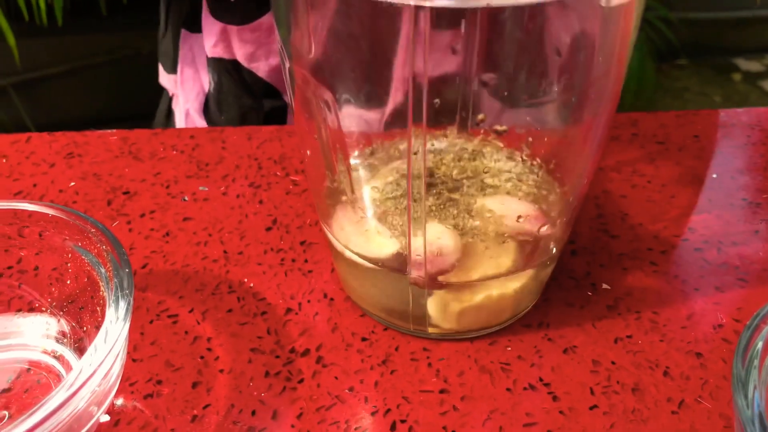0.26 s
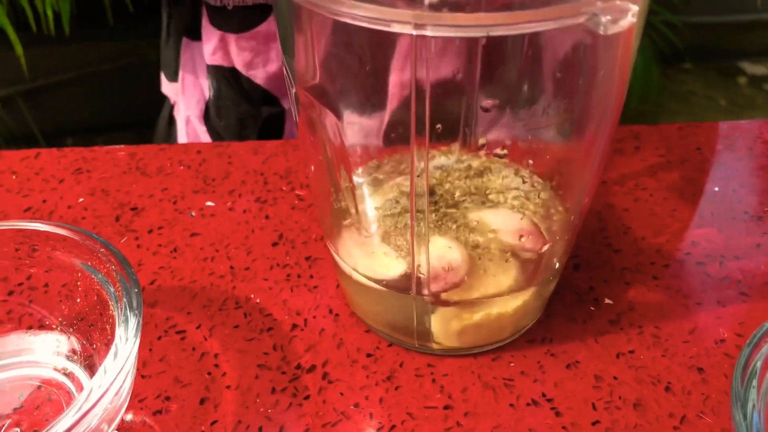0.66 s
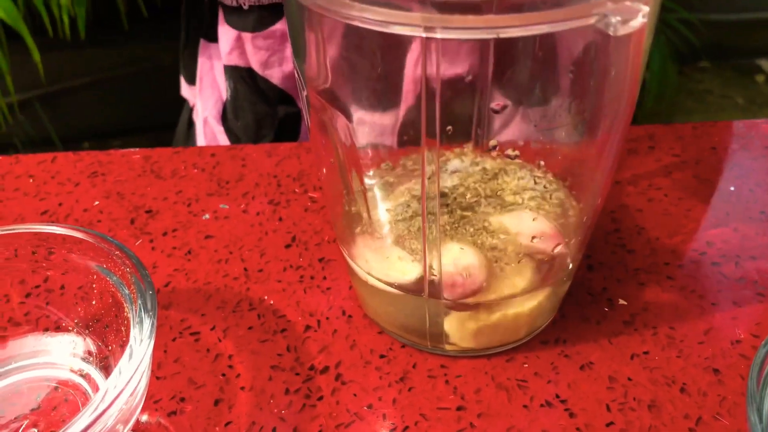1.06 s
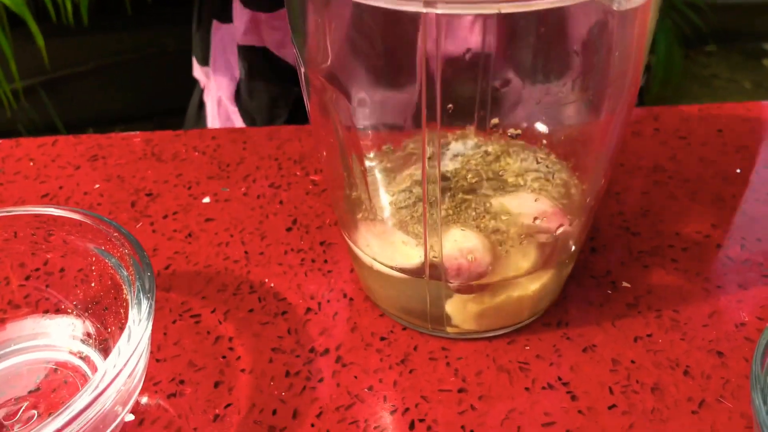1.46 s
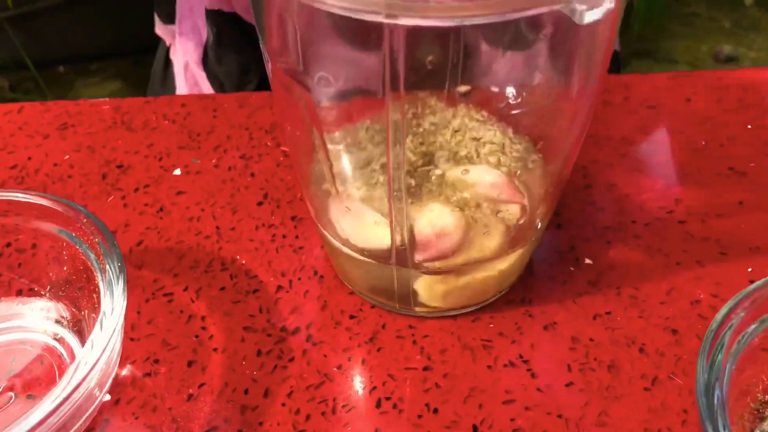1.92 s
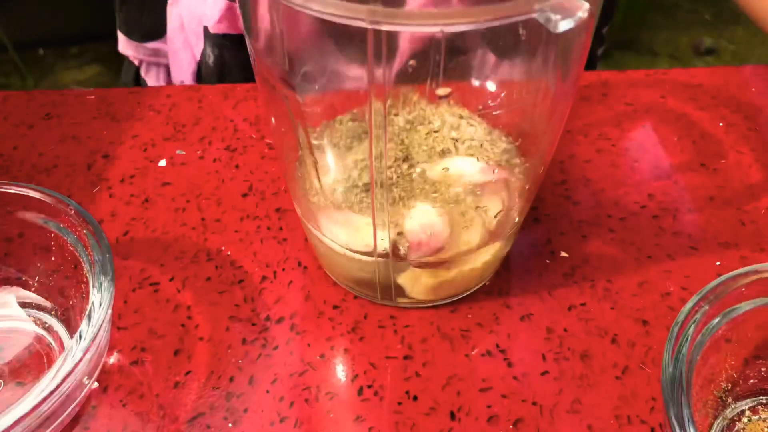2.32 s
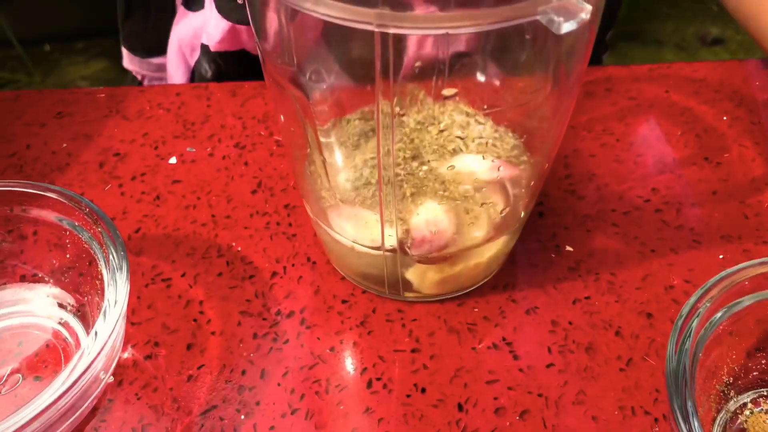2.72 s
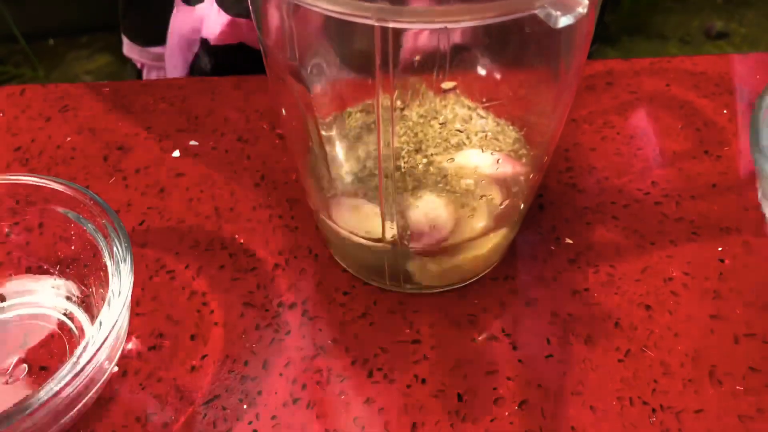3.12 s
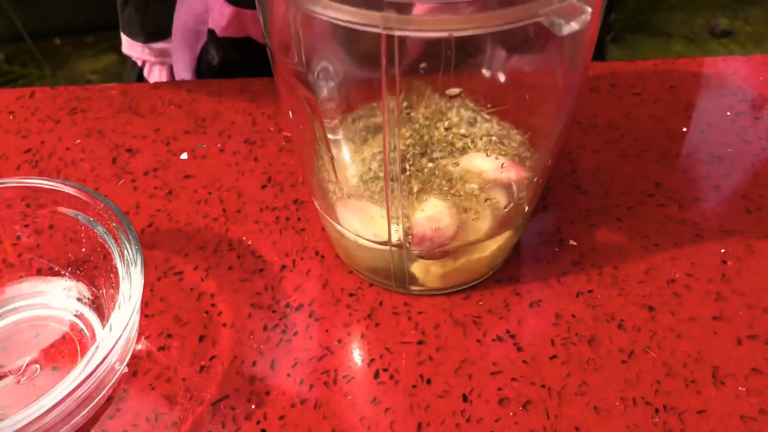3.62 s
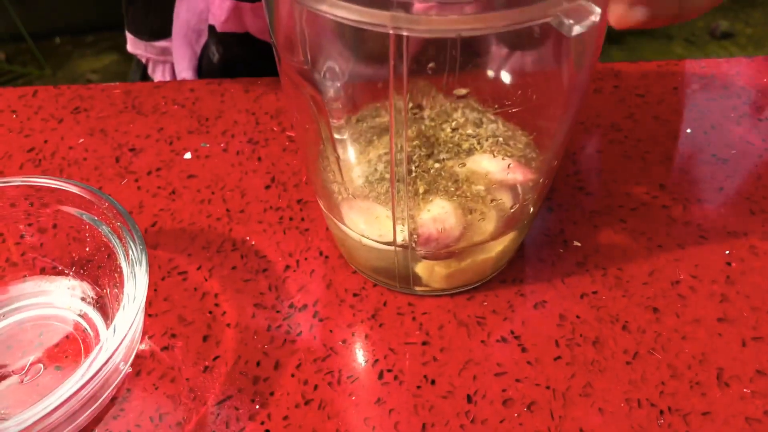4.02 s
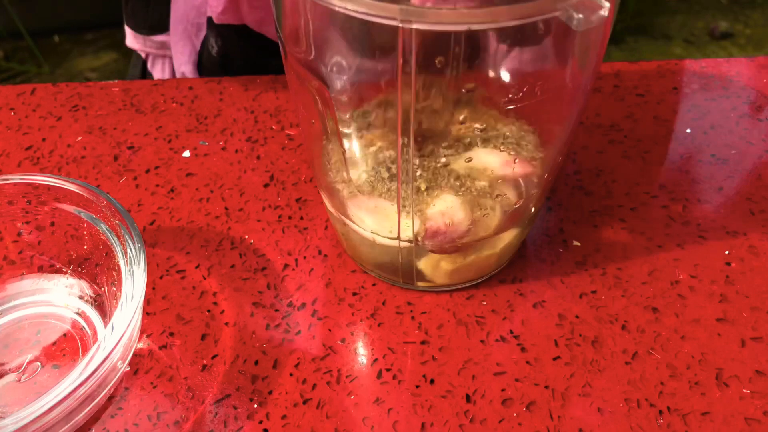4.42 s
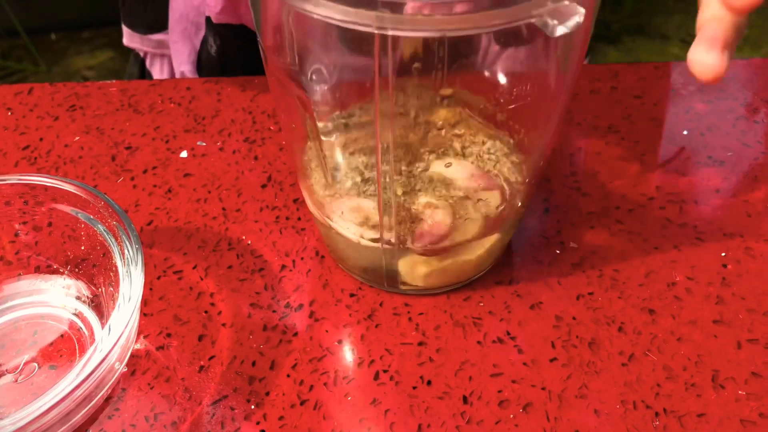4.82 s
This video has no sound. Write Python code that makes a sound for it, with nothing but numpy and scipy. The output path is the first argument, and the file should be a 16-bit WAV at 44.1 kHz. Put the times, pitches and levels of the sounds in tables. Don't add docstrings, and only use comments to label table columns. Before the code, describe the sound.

In a quiet garden with cheeping birds, a glass bowl clatters onto a stone counter, then another knocks hollowly against a blender jar.

```python
import sys
import numpy as np
from scipy import signal
from scipy.fft import rfft, irfft
from scipy.io import wavfile
from scipy.ndimage import uniform_filter1d

SR = 44100
rng = np.random.default_rng(int(sys.argv[2]) if len(sys.argv) > 2 else 0)


def pcm_store(signal):
    levels = np.round(np.clip(np.atleast_2d(signal), -1, 1) * 32767)
    wavfile.write(sys.argv[1], SR, levels.astype(np.int16).T)


def gain_from_decibels(decibels):
    exponent = np.asarray(decibels, float) / 20
    return 10 ** exponent


N = 223696


def shaped(x, spectrum):
    hz, db = np.transpose(spectrum)
    grid = np.log(np.fft.rfftfreq(N, 1 / SR) + 1)
    gain = gain_from_decibels(np.interp(grid, np.log(hz), db, left=-90, right=db[-1]))
    y = irfft(rfft(x) * gain, N)
    return y / np.std(y)


def coloured(spectrum):
    return shaped(rng.standard_normal(N), spectrum)


def passed(x, hz, kind):
    return signal.sosfilt(signal.butter(2, hz, kind, fs=SR, output="sos"), x)


def curve(rows, column):
    rows = np.array(rows)
    return np.interp(np.arange(N) / SR, rows[:, 0], rows[:, column])


def drift(rate_hz):
    smooth = signal.butter(2, rate_hz, fs=SR / 50, output="sos")
    slow = signal.sosfilt(smooth, rng.standard_normal(N // 50 + 1002))[1000:]
    return np.interp(np.arange(N) / 50, np.arange(len(slow)), slow / np.std(slow))


def swells(rows):
    t = np.arange(N) / SR
    return sum(np.interp(t, [s - swell_s, s, s + dwindle_s], [0, gain_from_decibels(db), 0])
               for s, db, swell_s, dwindle_s in rows)


def add(track, s, piece):
    at = round(s * SR)
    track[at:at + len(piece)] += piece[:N - at]


def bursts(times, levels_db, lengths, fall_s):
    out, t = np.zeros(N), np.arange(SR // 10) / SR
    for s, db, length in zip(times, levels_db, lengths):
        add(out, s, gain_from_decibels(db) * np.exp(-np.maximum(t - length, 0) / fall_s))
    return out


def strike(times, levels_db, modes, spread_db, dull_db=0):
    out, at = np.zeros(N), np.round(np.array(times) * SR).astype(int)
    chance = rng.standard_normal((len(at), len(modes)))
    for k, (hz, db, t60) in enumerate(modes):
        dulling_db = dull_db * np.log2(max(hz, 700) / 700)
        clicks = np.full(N, 1e-18)
        clicks[at] = gain_from_decibels(levels_db + db - dulling_db + spread_db * chance[:, k]) * (-1) ** k
        r, w = gain_from_decibels(-60 / (t60 * SR)), 2 * np.pi * hz / SR
        out += signal.lfilter([0, np.sin(w)], [1, -2 * r * np.cos(w), r * r], clicks)
    return out


def echoes(x, t60, cut_hz, gap_s):
    t = np.arange(SR // 2) / SR
    tail = rng.standard_normal(len(t)) * gain_from_decibels(-60 * t / t60) * np.clip(t / gap_s, 0, 1)
    tail = signal.sosfilt(signal.butter(1, cut_hz, fs=SR, output="sos"), tail)
    return signal.fftconvolve(x, tail / np.sqrt(np.sum(tail ** 2)))[:N]


# (frequency [Hz], level [dB per Hz])
YARD_COLOUR = [(13, -40), (22, -18), (81, 2), (250, -2.5), (279, -3), (348, -11.5), (378, -11),
               (411, -16.5), (499, -17), (676, -14), (867, -26.5), (1170, -24), (3000, -34.5),
               (7000, -41.5), (10400, -46.5), (12000, -43.5), (15800, -46), (16300, -48)]
# (time [s], gust level [dB])
BREEZE = [(0, 6.5), (.9, 2.5), (1.3, 2.5), (1.7, 3.5), (2.4, 2), (2.8, 3), (3.66, 0), (4.25, 1.5), (4.6, 1),
          (4.9, 0), (5.07, 3.5)]
HUM_DB, WIND_DB, RUMBLE_DB = -61, -62, -59.5
HUM_FOLLOWS = 0.49


def yard():
    air, gust_db = coloured(YARD_COLOUR), curve(BREEZE, 1)
    hum = passed(passed(air, 388, "high"), 388, "high")
    wind = passed(air, [110, 270], "band")
    drone = passed(rng.standard_normal(N), [50, 60], "band")
    rumble = passed(passed(air, 95, "low"), 95, "low")
    rumble = rumble / np.std(rumble) + 0.5 * drone / np.std(drone)
    layers = [(hum, HUM_DB + HUM_FOLLOWS * gust_db + 0.5 * drift(12.0)),
              (wind, WIND_DB + gust_db + 2.7 * drift(2.0)),
              (rumble, RUMBLE_DB + gust_db + 0.29 * drift(13.0))]
    return sum(x / np.std(x) * gain_from_decibels(db) for x, db in layers)


# (peak time [s], peak level [dB], swell [s], dwindle [s])
FLOCK_SWELLS = [
    (1.4, -75.5, 3.1, 1.6),
    (3.95, -71.5, 0.51, 1.2),
]


def flock():
    haze = passed(rng.standard_normal(N), [2700, 4500], "band")
    return haze / np.std(haze) * swells(FLOCK_SWELLS) * gain_from_decibels(1.6 * drift(21))


# (time [s], pitch [Hz], level [dB])
CROW_FALL = [
    (0, 484.7, -38),
    (.08, 462.6, -46),
    (.22, 419.7, -49),
    (.38, 387.5, -57.5),
    (.5, 385, -65.5),
]
# (frequency [Hz], level [dB per Hz])
THROAT_COLOUR = [(240, -56), (400, -19), (465, -8), (817, -10.5), (926, -3.5), (1050, -2), (1650, 2.5),
                 (2020, -11), (2250, -1), (2700, -8), (3300, -0.5), (3600, -10), (4000, -4.5), (4500, -7.5),
                 (5800, -8.5), (8000, -23.5), (10400, -32), (17600, -120)]
BEAK_OPEN_HZ, BEAK_CLOSES_S, BEAK_SHUT_HARMONIC = 1660, 0.14, 3.1


def rooster():
    t = np.arange(N) / SR
    pitch_hz = curve(CROW_FALL, 1)
    cycle = np.floor(np.cumsum(pitch_hz * (1 + .007 * drift(40))) / SR)
    pulses = np.diff(cycle, prepend=0) * (1 + .5 * np.cos(np.pi * cycle))
    voice = shaped(pulses + .055 * rng.standard_normal(N), THROAT_COLOUR)
    shut = np.clip((t - BEAK_CLOSES_S) / .08 + .5, 0, 1)
    beak_hz = (1 - shut) * BEAK_OPEN_HZ + shut * BEAK_SHUT_HARMONIC * pitch_hz
    turn = 2 * np.pi * np.cumsum(beak_hz) / SR
    beak = sum(2 * wave(turn) * passed(voice * wave(turn), 170, "low") for wave in (np.sin, np.cos))
    voice = voice + 0.94 * beak * np.clip(2.6 - 3.4 * t, 0, 1)
    close = echoes(voice, t60=0.0067, cut_hz=14000, gap_s=0.0029)
    distant = echoes(voice, t60=1.0, cut_hz=12000, gap_s=0.0031)
    fade = np.clip((CROW_FALL[-1][0] + 0.2) * 8 - 8 * t, 0, 1)
    return (0.75 * close + 0.94 * distant) * gain_from_decibels(curve(CROW_FALL, 2) - 5.5) * fade


# (peak time [s], peak level [dB], swell [s], dwindle [s])
TRICKLES = [
    (.11, -57, 0.1, 0.14),
    (.716, -62, 0.044, .03),
    (1.146, -64.5, .05, .05),
    (1.59, -64, 0.069, 0.11),
    (1.662, -56.5, 0.071, 0.094),
    (3.34, -66, .03, 0.026),
    (4.32, -69, 0.024, 0.092),
]
# (time [s], peak level [dB])
STRAY_TICKS = [(0.564, -45), (0.5945, -46), (0.697, -46), (0.7194, -58.5), (1.1154, -52), (1.1428, -50),
               (1.275, -42), (1.296, -40), (1.4546, -47), (1.5834, -39), (1.9175, -52), (2.0794, -48),
               (2.1315, -43.5), (2.3194, -53), (3.3344, -61), (3.959, -66.5)]
# (frequency [Hz], level [dB per Hz])
GRAIN_COLOUR = [(1060, -49), (1800, -16), (2700, -10.5), (3430, -7), (3900, -14), (5630, -16.5),
                (15100, -14), (16200, -14)]


def spice():
    landed = rng.random(N) < 2500 / SR
    force = gain_from_decibels(2.5 * np.minimum(rng.exponential(1, N), 4.0))
    grains = landed * force * rng.choice([-1, 1], N)
    pour = shaped(grains, GRAIN_COLOUR) * swells(TRICKLES) * gain_from_decibels(1.64 * drift(20))
    s, db = np.transpose(STRAY_TICKS)
    return pour + coloured(GRAIN_COLOUR) * bursts(s, db - 17.0, 0 * s + 0.0032, fall_s=0.0054)


# (time [s], peak level [dB], start pitch [Hz], airy top level [dB])
BIRD_CHEEPS = [(.37, -49, 3300, -66), (0.5696, -49, 3270, -58), (0.737, -49, 3320, -62),
               (0.838, -50, 3430, -67), (1.033, -48.5, 3350, -69), (1.131, -47.5, 3240, -68),
               (1.367, -48, 3290, -59), (1.386, -46, 3500, -61), (1.444, -48.5, 3840, -65),
               (1.493, -46.5, 3330, -60), (1.6132, -47, 3130, -55), (1.6402, -53, 3350, -66),
               (1.6644, -45.5, 3440, -59), (1.942, -46.5, 3180, -66), (1.964, -47.5, 3270, -59),
               (2.071, -49, 3340, -61), (2.093, -48, 3240, -66), (2.2537, -47, 3220, -65),
               (2.282, -44, 3120, -53), (2.3814, -47, 3130, -71), (2.46, -61.5, 4050, -59),
               (4.03, -53, 3180, -73), (4.4404, -47.5, 3270, -59), (4.5844, -54.5, 3180, -59)]
CHEEP_S, CHEEP_RISE_HZ = 0.021, 846


def bird():
    out, flutter_hz = np.zeros(N), 40 * drift(300)
    u = np.linspace(0, 1, round(CHEEP_S * SR))
    for s, db, hz, airy_db in BIRD_CHEEPS:
        pitch = hz - 250 + CHEEP_RISE_HZ * u + flutter_hz[round(s * SR):][:len(u)]
        swell = gain_from_decibels(db - 8 - 6 * u) * np.sin(np.pi * u ** .7)
        add(out, s, swell * np.sin(2 * np.pi * np.cumsum(pitch) / SR))
    s, db, hz, airy_db = np.transpose(BIRD_CHEEPS)
    air = passed(rng.standard_normal(N), [3700, 4900], "band")
    air *= uniform_filter1d(bursts(s + 0.011, airy_db + 0.5, 0 * s + 0.012, fall_s=0.033), size=400)
    out *= gain_from_decibels(2 * drift(200))
    return .6 * out + .55 * echoes(out, t60=.16, cut_hz=6000, gap_s=.006) + air


# (time [s], low ring level [dB], high ring level [dB], length [s])
SLIDES = [
    (1.45, -85, -77.5, 0.098),
    (2.67, -57, -89, 0.011),
    (2.685, -46, -83, .008),
    (3.33, -74, -75, 0.028),
    (4.125, -67, -86, 0.041),
    (4.252, -59, -73, 0.025),
    (4.368, -51.5, -70, 0.0046),
    (4.549, -66, -77.5, 0.042),
]


def rubs():
    out = np.zeros(N)
    s, low_db, high_db, length = np.transpose(SLIDES)
    for hz, width_hz, db in [(2950, 300, low_db - 0.5), (6710, 250, high_db), (11800, 770, high_db - 3.0)]:
        whisper = passed(rng.standard_normal(N), [hz - width_hz / 2, hz + width_hz / 2], "band")
        out += whisper / np.std(whisper) * uniform_filter1d(bursts(s, db, length, fall_s=0.0074), size=200)
    return out


# (frequency [Hz], level [dB], t60 [s])
SNAP_MODES = [(560, -1, .01), (1050, -1, .008), (1400, 5, .005), (2900, 11, .0045), (4300, 0, .004)]
# (frequency [Hz], level [dB], t60 [s])
FLAT_MODES = [(290, -2.5, 0.097), (480, -1, 0.068), (600, -1, 0.0062), (710, -11, .02), (860, -14.5, 0.043),
              (1096, -3, 0.025), (1413, -15, 0.032), (1700, -0.5, 0.012), (1944, -1.5, 0.037),
              (2210, 10, 0.013), (2712, 11.5, 0.027), (2705, 17, 0.021), (3440, 5.5, 0.024),
              (4490, -11.5, 0.039), (5220, -2.5, .009)]
# (frequency [Hz], level [dB], t60 [s])
TIPPED_MODES = [(285, -17.5, 0.031), (518, -1.5, .05), (425, -5.5, .04), (620, -4.5, 0.074),
                (755, -6, 0.031), (1000, -15, .03), (1235, -1, 0.036), (1612, -11, 0.047),
                (1860, 6.5, 0.022), (2030, 1, 0.016), (2515, 6.5, 0.029), (2820, 17.5, 0.0055),
                (3000, 4.5, 0.023), (3330, -11, 0.023), (4530, -13, 0.039)]
TIPS_AT_S = 2.82


def slab_blows(s, peak_db, dull_db):
    tipped = s > TIPS_AT_S
    snap = strike(s, peak_db - 14, SNAP_MODES, 1, dull_db)
    flat = strike(s, peak_db - 22.5 - 99 * tipped, FLAT_MODES, 1, dull_db)
    return snap + flat + strike(s, peak_db - 24.0 - 99 * ~tipped, TIPPED_MODES, 1, dull_db)


# (time [s], peak level [dB], treble level [dB], free ring level [dB], dullness [dB per octave])
BOWL_TOUCHES = [(2.692, -16, -64, -69, -0.5), (2.6937, -0.5, -34.5, -56.5, 1.5),
                (2.730, -10.5, -42, -62, -0.5), (2.7504, -9.5, -49.5, -64, 3),
                (2.761, -14.5, -69, -61, 4.5), (2.768, -20, -73, -68.5, 5), (2.773, -25, -87, -65.5, 17),
                (2.782, -25, -84, -48, 9), (2.8644, -6, -76, -66, 17.5), (2.868, -20, -85, -69.5, 11),
                (2.893, -8.5, -67, -56.5, 7.5), (2.9013, -6.5, -70, -23.5, 1.85),
                (2.907, -16, -73, -43, 18), (2.913, -16, -75, -55, 23)]
# (frequency [Hz], level [dB], t60 [s])
HELD_GLASS = [(6740, 12, 0.018), (8470, -2, 0.0091), (9030, -21.5, 0.011), (12350, -23, .02),
              (15510, -12.5, 0.022)]
SOFT_FROM_DB, SOFT_CUT_HZ = 9, 1700


def bowl():
    s, peak_db, treble_db, free_db, dull_db = np.transpose(BOWL_TOUCHES)
    soft = dull_db > SOFT_FROM_DB
    padded = passed(slab_blows(s[soft], peak_db[soft], dull_db[soft] - 10.0), SOFT_CUT_HZ, "low")
    padded = passed(padded, SOFT_CUT_HZ, "low")
    slab = passed(slab_blows(s[~soft], peak_db[~soft], dull_db[~soft]) + padded, 4200, "low")
    near_edge = slab + strike(s, treble_db - 7.0, HELD_GLASS, 0.97)
    far_edge = np.roll(near_edge, round(.0013 * SR))
    rattle = gain_from_decibels(-7) * echoes(slab, t60=0.067, cut_hz=1230, gap_s=0.0019)
    return passed(.7 * near_edge + 1.5 * far_edge + rattle, 260, "high")


# (frequency [Hz], level [dB], t60 [s])
FREE_MODES = [(2870, -6.5, 0.22), (6837, -31.5, 0.092)]


def free_ring():
    s, peak_db, treble_db, free_db, dull_db = np.transpose(BOWL_TOUCHES)
    return passed(strike(s, free_db + 3.0, FREE_MODES, 0), 9000, "low")


GRIT_UNDER_BLOW_DB, GRIT_FALL_S = 28, 0.0037


def grit():
    s, peak_db, treble_db, free_db, dull_db = np.transpose(BOWL_TOUCHES)
    crunch = passed(passed(rng.standard_normal(N), [900, 5600], "band"), 3650, "low")
    crunch_db = peak_db - GRIT_UNDER_BLOW_DB + 11.0 - 2.8 * dull_db
    return crunch * bursts(s + 0.003, crunch_db, 0 * s + 0.0026, fall_s=GRIT_FALL_S)


# (time [s], peak level [dB], treble level [dB])
RIM_KNOCKS = [(3.909, -32.5, -51.5), (3.919, -38.5, -58.5), (4.052, -36, -52.5), (4.0735, -22, -43),
              (4.0946, -34.5, -71), (4.125, -50, -70), (4.157, -40, -60), (4.2395, -25, -44),
              (4.279, -33, -71), (4.2886, -13, -71), (4.309, -35, -63), (4.3264, -45, -66),
              (4.347, -51, -65), (4.449, -38, -68), (4.6519, -15.5, -35), (4.6745, -21.5, -44),
              (4.6804, -14, -30), (4.6982, -21, -48), (4.7113, -23, -54), (4.714, -17.5, -41),
              (4.733, -29.5, -73), (4.806, -46, -83), (4.8624, -14.5, -36), (4.8795, -10.5, -26),
              (4.8859, -6.5, -23.5), (4.8955, -13, -27.5), (4.914, -24, -42), (4.9272, -21, -51),
              (4.941, -31, -63), (5.02, -47, -73), (5.0416, -17, -40.5), (5.0628, -7, -33)]
# (frequency [Hz], level [dB per Hz])
BODY_COLOUR = [(530, -1.5), (900, -6), (1160, -3.5), (1700, -13), (2280, -9.5), (2890, -1), (4330, -21),
               (4800, -33.5), (5370, -26), (6000, -42.5), (7800, -73), (13200, -120)]
# (frequency [Hz], level [dB per Hz])
TREBLE_COLOUR = [(2940, 4), (5000, -2), (5940, -10), (6780, -8), (10200, -12), (14000, -13), (16200, -23.5)]
# (frequency [Hz], level [dB], t60 [s])
RIM_MODES = [(924, -3.5, 0.044), (1210, -29, 0.017), (1554, 0, 0.021), (1820, 5.5, 0.0078),
             (2290, -3.5, 0.015), (2830, -2.5, 0.017), (3500, -2, 0.014), (4260, -9, 0.021)]
# (frequency [Hz], level [dB], t60 [s])
SPICE_BOWL_MODES = [(6820, 4.5, 0.027), (4185, -1, 0.033), (8680, 5, 0.005), (12400, -28.5, .025),
                    (14900, -27, 0.022)]
CONTACT_S, RING_UNDER_TREBLE_DB = 0.0024, 0.5
TIGHT_GRIP_DB = -10.5
LOOSE_GRIP_S = (4.2, 4.8)


def knocks():
    s, peak_db, treble_db = np.transpose(RIM_KNOCKS)
    contact_s = np.full(len(s), CONTACT_S)
    body = coloured(BODY_COLOUR) * bursts(s, peak_db - 16, contact_s, fall_s=0.0046)
    treble = coloured(TREBLE_COLOUR) * bursts(s, treble_db + 1.5, 0.46 * contact_s, fall_s=0.0032)
    rim = passed(strike(s, peak_db - 23.5, RIM_MODES, 2.9), 4800, "low")
    tight = (s < LOOSE_GRIP_S[0]) | (s > LOOSE_GRIP_S[1])
    ring_db = treble_db - RING_UNDER_TREBLE_DB + TIGHT_GRIP_DB * tight
    return body + treble + rim + strike(s, ring_db, SPICE_BOWL_MODES, 1.2)


# (time [s], peak level [dB], pitch [Hz])
FOOT_BUMPS = [(3.91, -43.5, 250), (3.93, -39, 320), (4.073, -28.5, 408), (4.089, -29, 323),
              (4.104, -38.5, 252), (4.177, -43, 290), (4.24, -27.5, 342), (4.261, -38, 260),
              (4.296, -26.5, 293), (4.315, -42, 234), (4.341, -39.5, 336), (4.45, -37, 285),
              (4.652, -25, 280.4), (4.668, -29, 206), (4.688, -28, 335), (4.706, -34, 220),
              (4.721, -27, 227), (4.748, -52.5, 330), (4.805, -41.5, 352), (4.862, -41, 335),
              (4.874, -31, 198), (4.89, -20, 212), (4.903, -31, 260), (4.917, -32, 231), (4.937, -33, 219),
              (4.955, -38, 303), (4.975, -45.5, 220), (5.042, -30.5, 400), (5.05, -34, 198),
              (5.063, -26, 305)]
# (frequency [Hz], level [dB], t60 [s])
ROCKING_MODES = [(113, -8.5, 0.082), (150, 2.5, 0.036), (224.7, 4.5, 0.17), (260, 0, 0.062), (302, 2, 0.14),
                 (352.7, 2.5, 0.18), (424, 1, 0.13)]
BUMP_RISE_S, BUMP_FALL_S = 0.0075, 0.0081
ROCKING_DB = -12.5


def bumps():
    out, t = np.zeros(N), np.arange(SR // 10) / SR
    swing = (1 - np.exp(-t / BUMP_RISE_S)) * np.exp(-t / BUMP_FALL_S)
    for s, db, hz in FOOT_BUMPS:
        add(out, s, gain_from_decibels(db + 5.5) * swing * np.sin(2 * np.pi * hz * t))
    s, db, hz = np.transpose(FOOT_BUMPS)
    return out + strike(s, db + ROCKING_DB, ROCKING_MODES, 4.46)


# (time [s], peak level [dB], pitch [Hz], free swing [s])
JAR_BOOMS = [(3.911, -37.5, 612, 0.018), (3.922, -33, 576, 0.017), (4.055, -32, 596, 0.014),
             (4.076, -16.5, 597, 0.0056), (4.096, -27, 588, 0.0056), (4.122, -41, 600, 0.0088),
             (4.16, -34, 580, 0.0085), (4.243, -20.5, 556, 0.0076), (4.25, -32, 600, 0.01),
             (4.279, -24.5, 568, 0.011), (4.2886, -9.5, 581, 0.01), (4.335, -54, 610, 0.01),
             (4.45, -33, 555, 0.0071), (4.655, -13.5, 575, 0.0098), (4.67, -20, 584, 0.01),
             (4.681, -7, 574, 0.015), (4.7, -40, 670, .0077), (4.708, -14, 577.5, 0.022),
             (4.718, -9.5, 604, 0.01), (4.732, -22.5, 526, 0.0053), (4.752, -35.5, 620, 0.024),
             (4.867, -13.5, 578, 0.0051), (4.888, 2.5, 583.4, 0.014), (4.9102, -10, 603, 0.0057),
             (4.9205, -11, 586, 0.013), (4.942, -33, 600, 0.0042), (5.0, -40, 590, .01),
             (5.043, -26, 556, 0.0054), (5.053, -17, 585, 0.019), (5.066, -5.5, 567, 0.013)]
# (frequency [Hz], level [dB], t60 [s])
JAR_MODES = [(490, -12.5, 0.037), (587, -45, 0.16), (633, -45, 0.53), (650, -24, 0.013), (967, -25, 0.053),
             (1450, -25.5, 0.034)]


def jar():
    out, t = np.zeros(N), np.arange(SR // 8) / SR
    for s, db, hz, free_s in JAR_BOOMS:
        choke = np.maximum(t - free_s, 0) / .005
        swing = (1 - np.exp(-t / .0012)) * np.exp(-t / .12 - choke)
        add(out, s, gain_from_decibels(db - 2.5) * swing * np.sin(2 * np.pi * hz * t))
    s, db, hz, free_s = np.transpose(JAR_BOOMS)
    return out + strike(s, db + 2.0, JAR_MODES, 1.9)


def scene():
    garden = yard() + flock() + rooster() + spice() + bird()
    near = passed(bowl() + grit() + knocks() + bumps() + jar(), 48, "high")
    near = near + gain_from_decibels(-26) * echoes(near, t60=0.18, cut_hz=1450, gap_s=0.0043)
    return (garden + rubs() + near + free_ring())[None]


def roll_off(x):
    return signal.sosfilt(signal.butter(12, 16350, fs=SR, output="sos"), x)


def record(dry):
    rounded = 1.37 * np.tanh(dry / 1.205)
    top_cut = signal.ellip(10, .3, 70, 15950, fs=SR, output="sos")
    return roll_off(signal.sosfilt(top_cut, rounded))


dry = scene()
out = record(dry)
pcm_store(out)
```